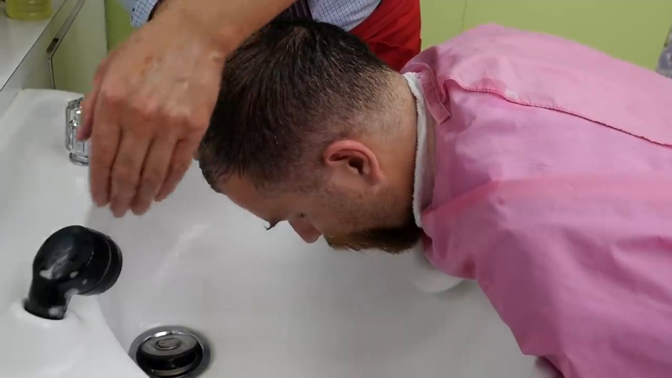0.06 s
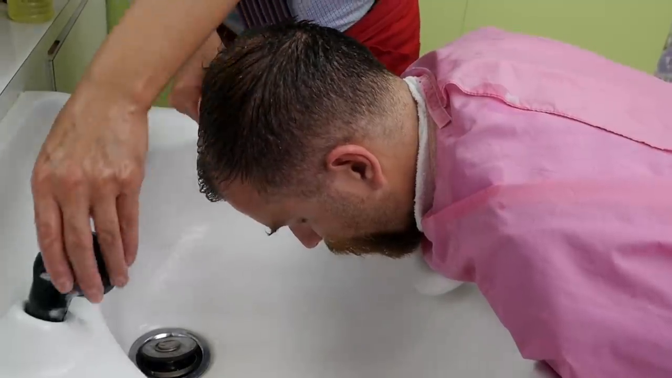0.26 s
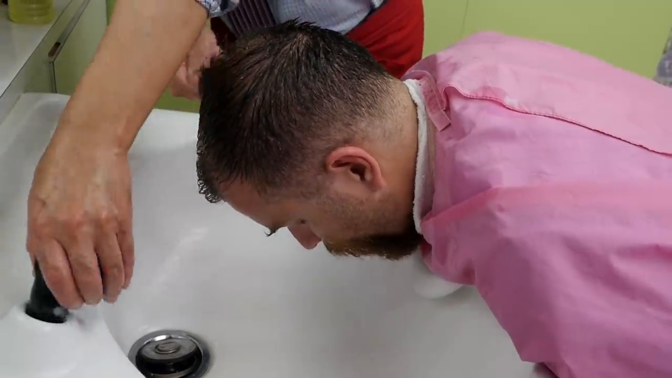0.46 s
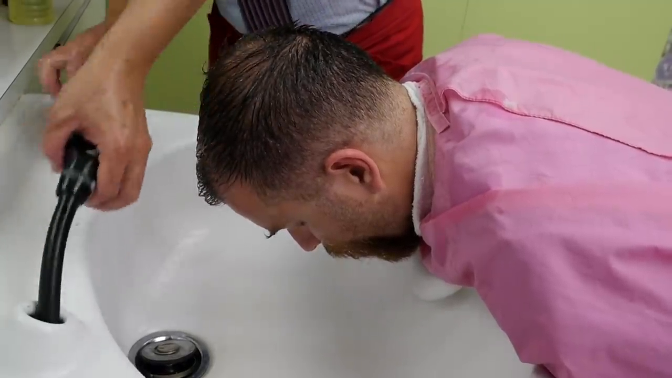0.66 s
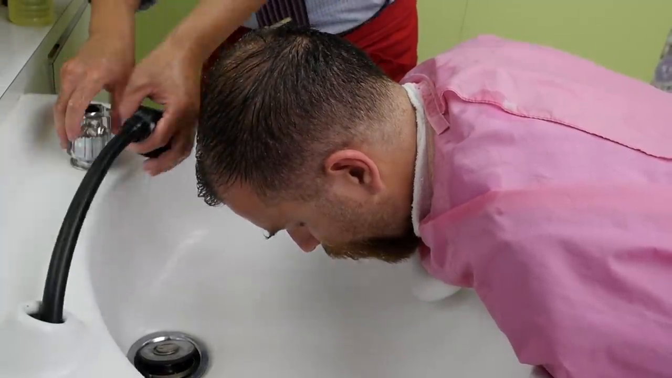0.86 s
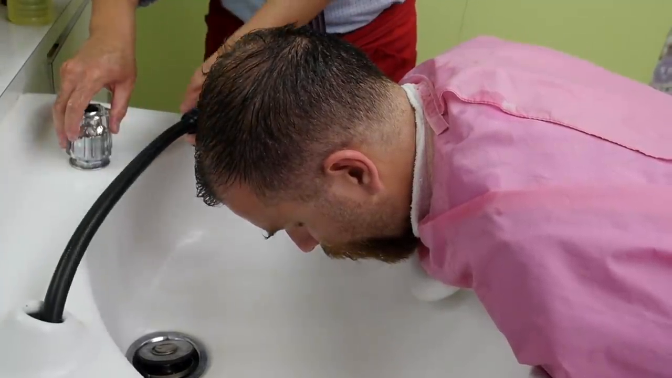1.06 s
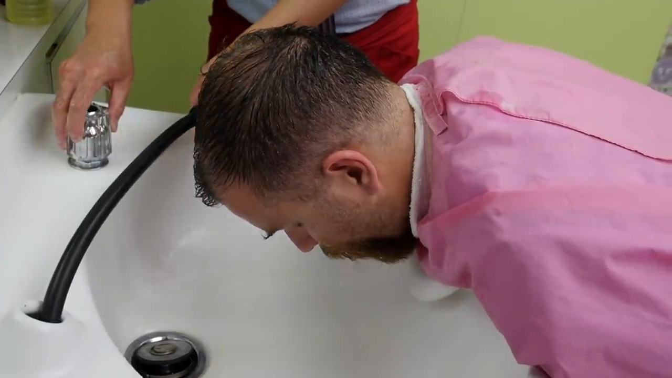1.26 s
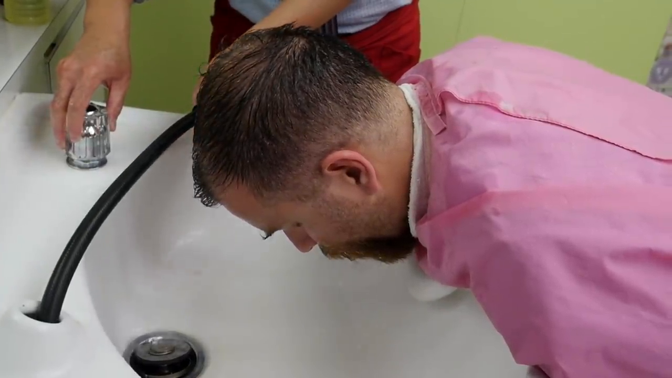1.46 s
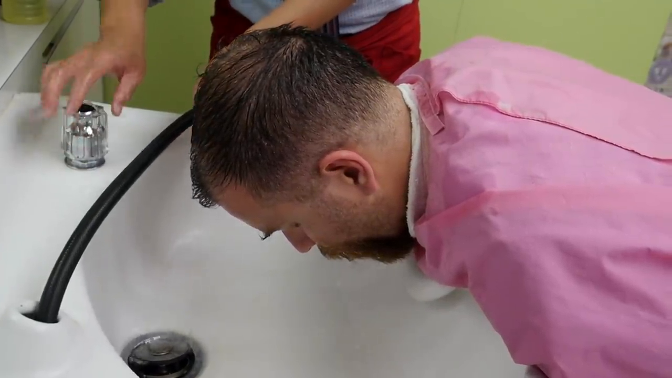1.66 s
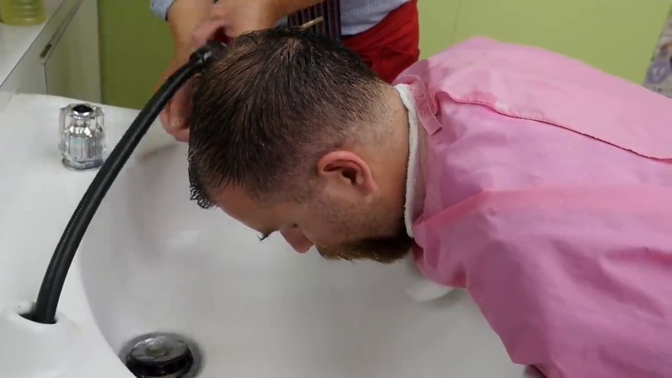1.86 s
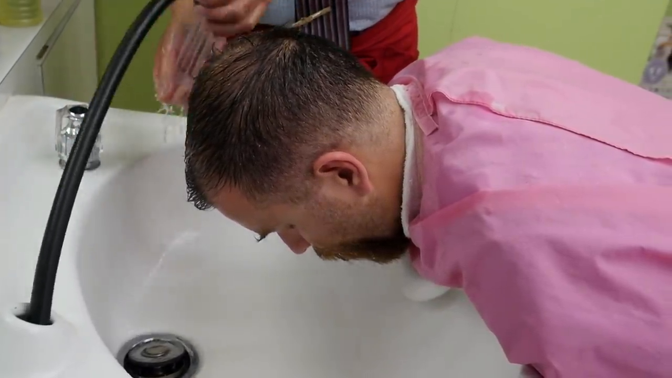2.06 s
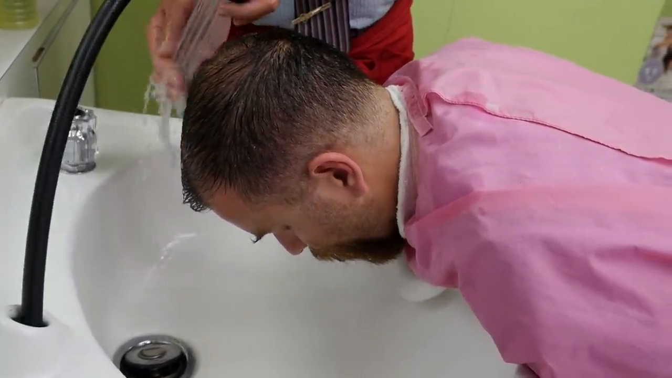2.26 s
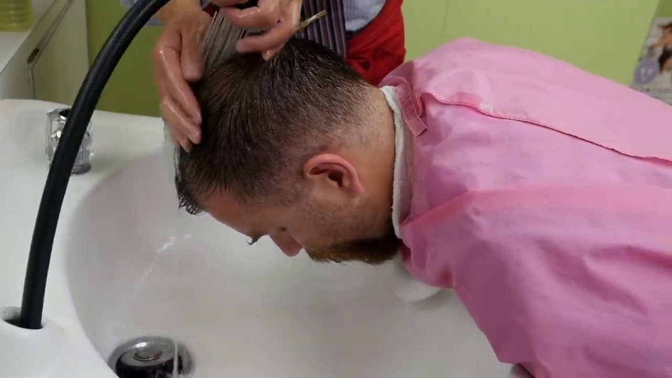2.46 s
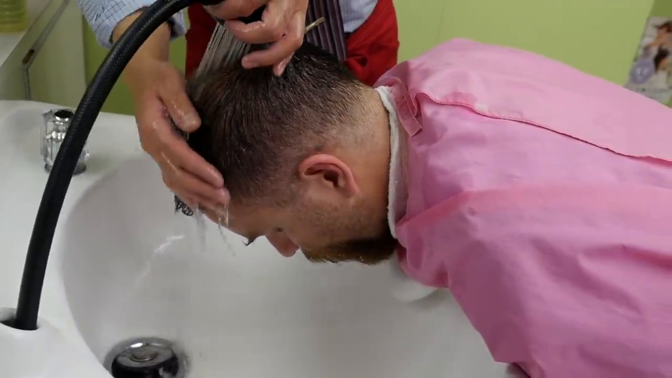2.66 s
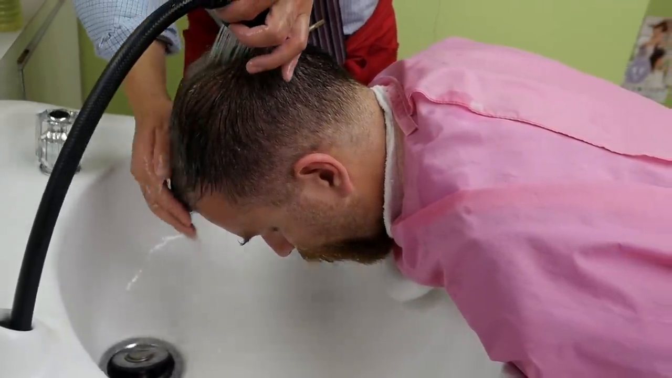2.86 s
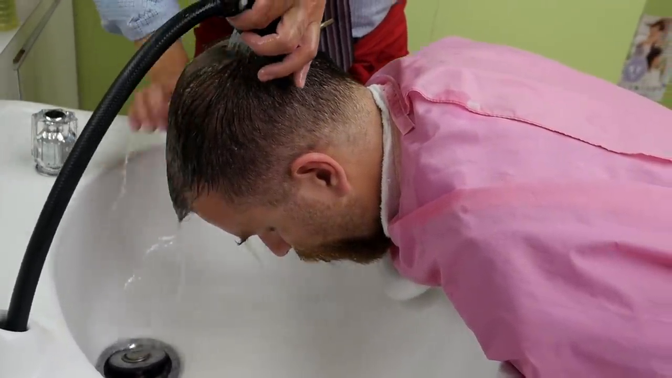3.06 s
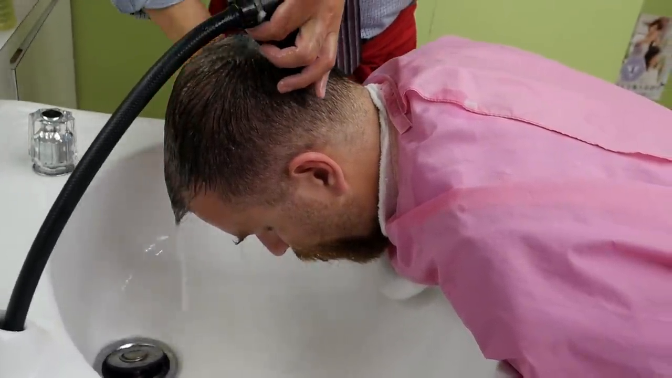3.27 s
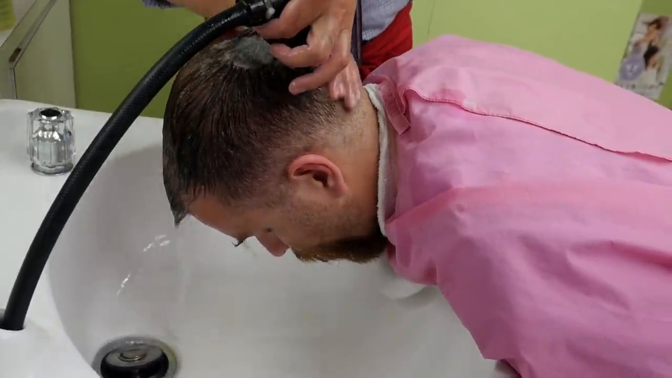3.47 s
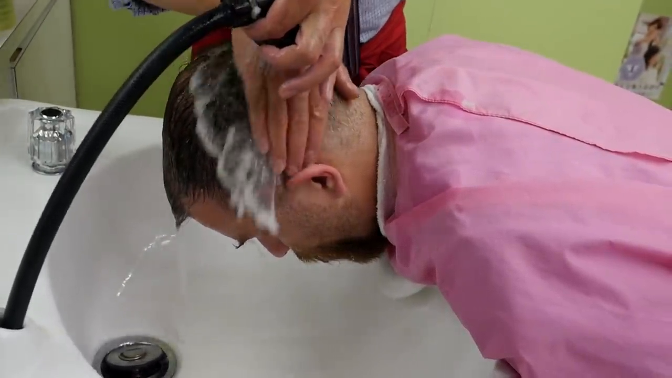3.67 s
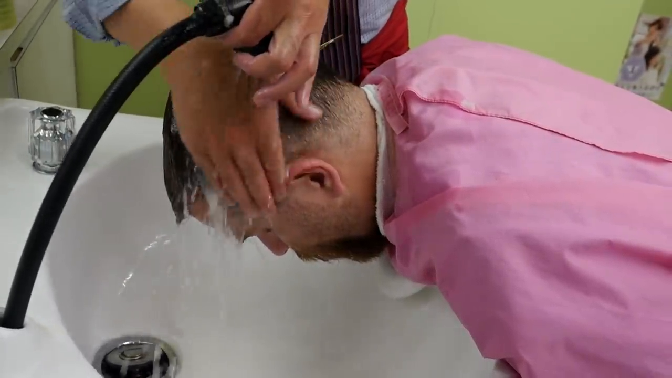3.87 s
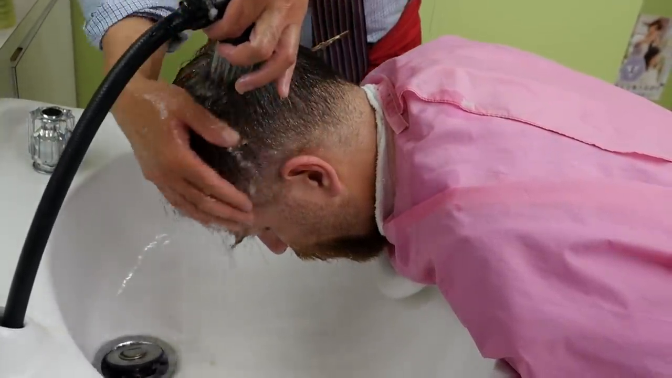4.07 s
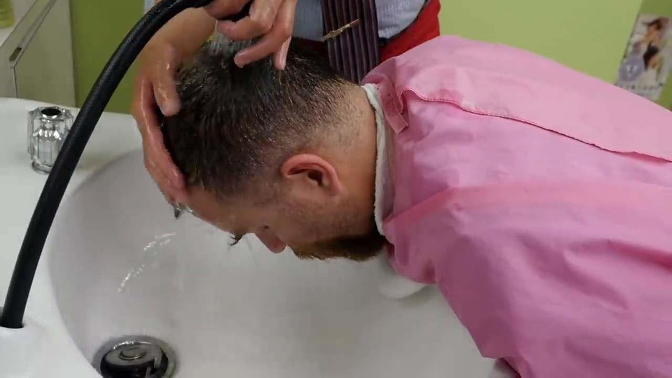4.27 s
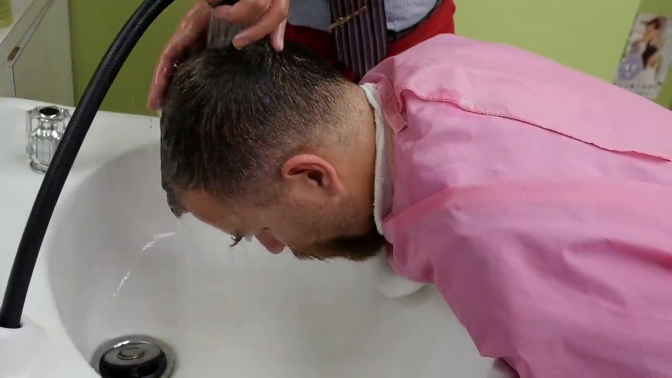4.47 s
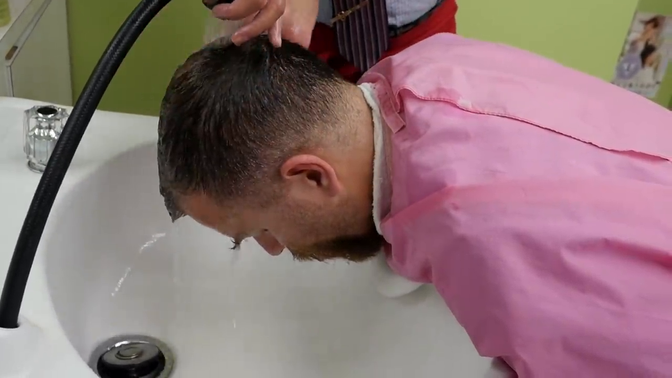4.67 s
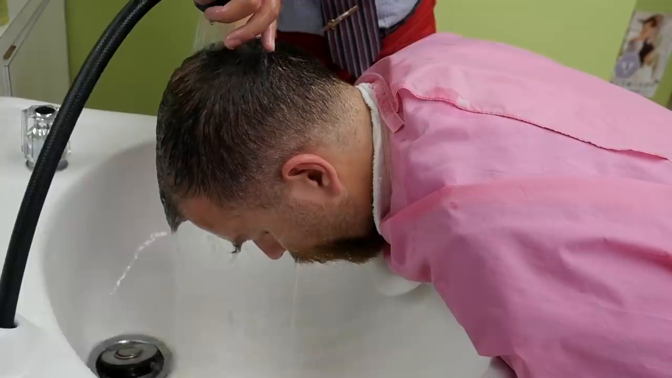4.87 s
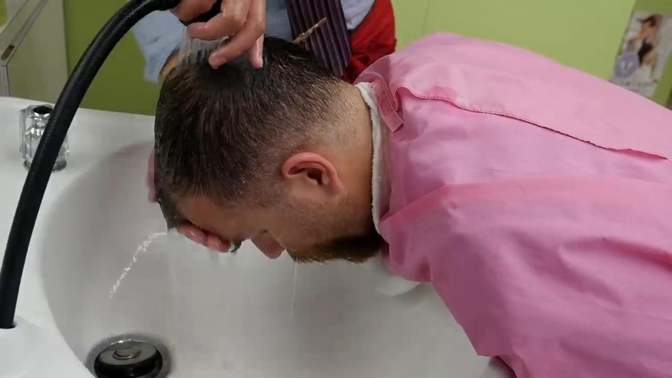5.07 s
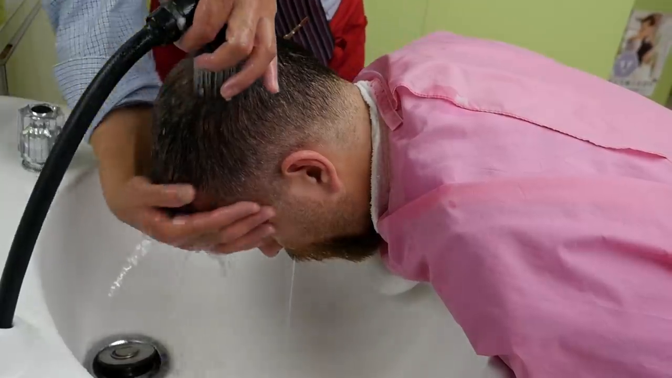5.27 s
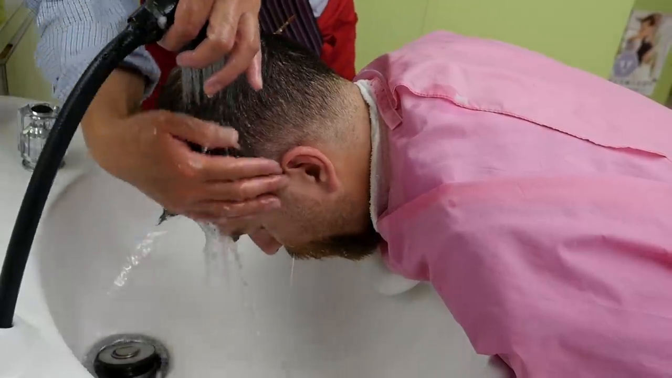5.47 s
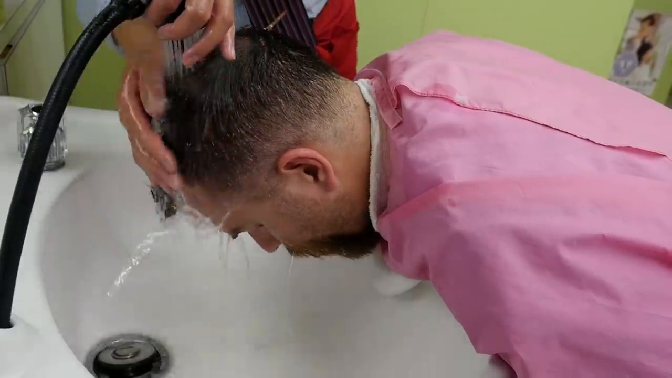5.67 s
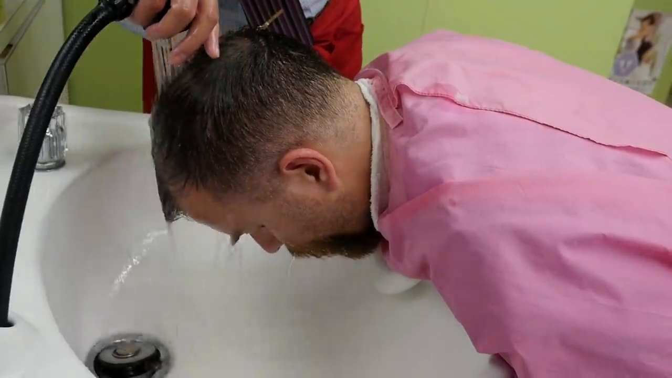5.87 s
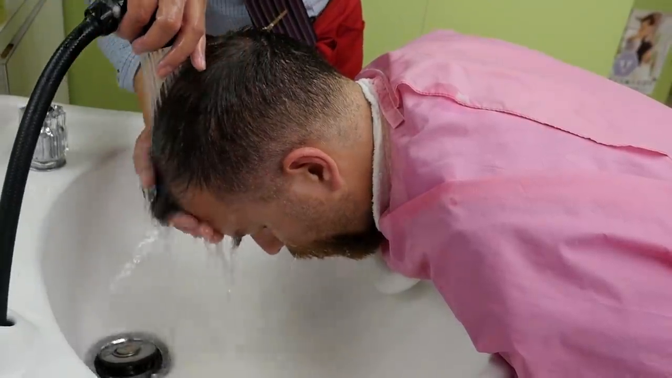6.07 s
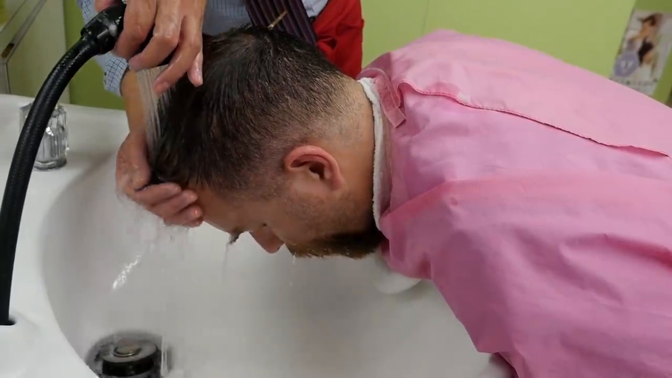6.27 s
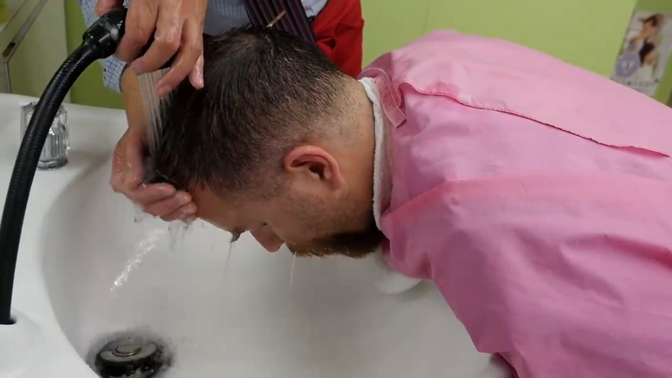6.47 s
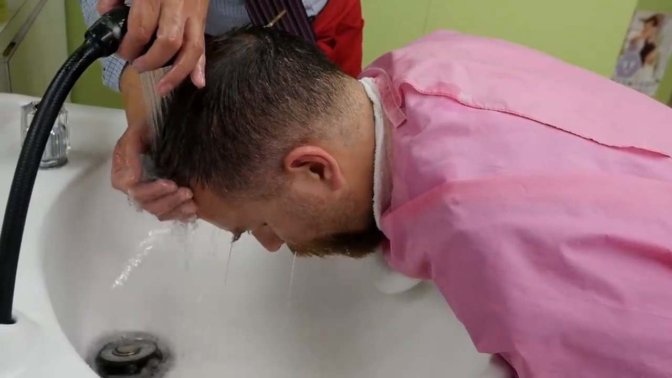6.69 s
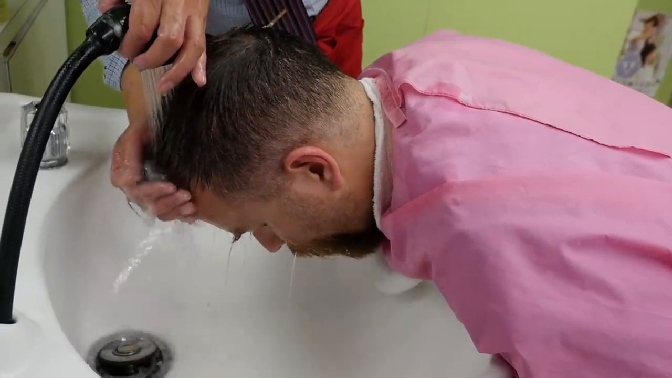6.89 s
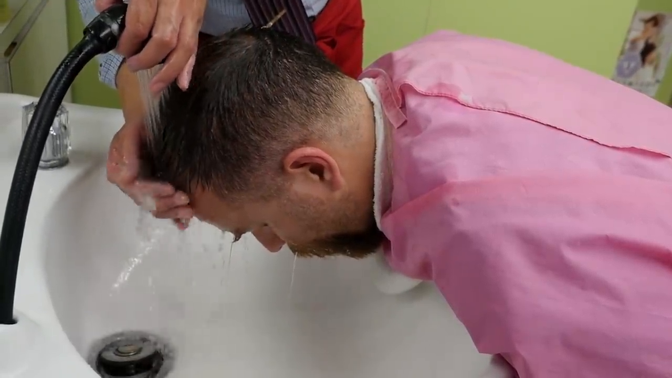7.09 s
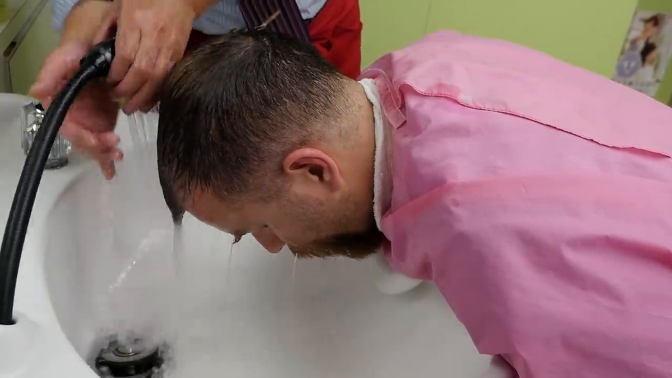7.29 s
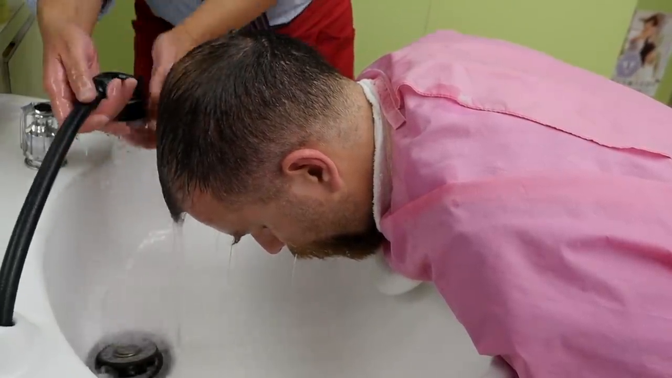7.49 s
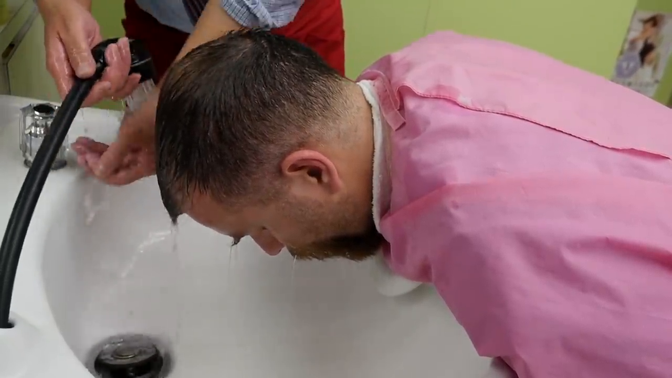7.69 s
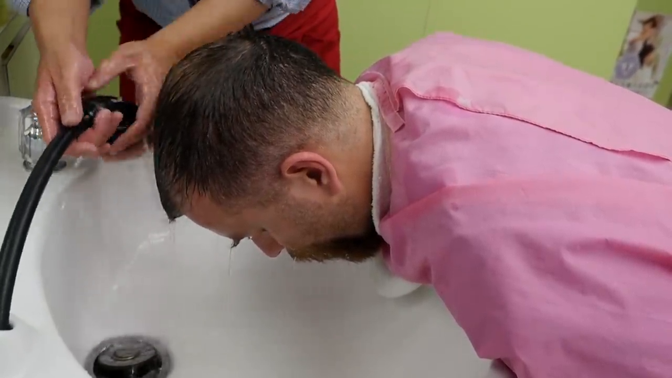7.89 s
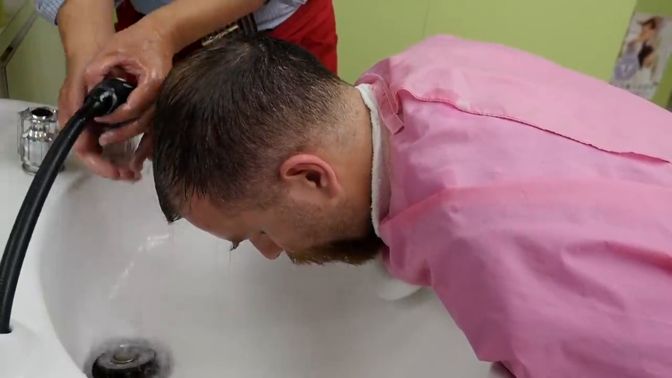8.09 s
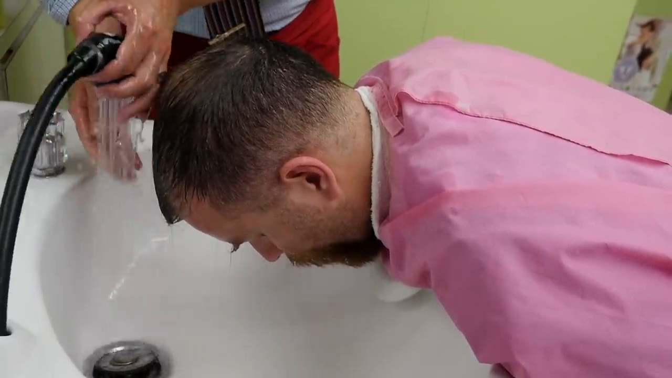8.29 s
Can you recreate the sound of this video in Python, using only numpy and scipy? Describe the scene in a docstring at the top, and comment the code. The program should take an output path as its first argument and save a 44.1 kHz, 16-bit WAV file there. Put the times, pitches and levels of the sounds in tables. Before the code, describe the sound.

Close stereo pickup at a ceramic salon basin in a quiet room. A sprayer clacks out of its seat, bumps thud low, and the hose groans briefly. A tap squeaks high and water jets hiss on. The spray then drums over wet hair in shifting-pitch strokes, with crackling splashes, tiny spits, hollow glugs and faint patter in the bowl.

```python
"""A salon's glazed ceramic basin, where hair is rinsed. The sprayer clacks out of its seat, bumps excite the basin's
low modes, the hose groans by stick-slip as it is pulled out, and the tap's seal squeaks as a gliding tone.
Jets hiss as coloured trains of random impacts, then drum on wet hair and a cupped hand as resonant froth.
Water spits in short unsteady bursts, trapped air glugs in brief throbs, and run-off patters on the basin's modes.
Reflections and a short tail surround these; a quiet room noise dips under loud peaks."""
import sys
import numpy as np
from scipy import signal
from scipy.fft import rfft, irfft
from scipy.io import wavfile
from scipy.ndimage import uniform_filter1d

SR = 44100
rng = np.random.default_rng(int(sys.argv[2]) if len(sys.argv) > 2 else 0)


def transcribe(signal):
    """Save signal, clipped to [-1, 1], as a 16-bit WAV file at the path in sys.argv[1]."""
    frames = np.atleast_2d(signal).T
    limited = np.clip(frames, -1, 1)
    pcm = np.round(limited * 32767).astype(np.int16)
    wavfile.write(sys.argv[1], SR, pcm)


N = 367794
TIME = np.arange(N) / SR
TAP_OPEN_S, CUPPED_S = 1.333, 5.15   # jets start; the hand is cupped from then on

# low modes of the basin: (frequency [Hz], relative level [dB], bandwidth [Hz])
BASIN_MODES = [(185, -2, 26), (273, -4, 19.6), (384, -6, 77), (593, 0, 32)]


def from_db(db):
    """Amplitude ratio of a level in decibels."""
    return 10 ** (np.asarray(db) / 20)


def rms_one(x):
    """Normalization to unit root-mean-square."""
    return x / np.sqrt(np.mean(x ** 2) + 1e-20)


def drift(rate):
    """Band-limited chance: random knots, rate per second, joined by straight lines; rms 1."""
    knots = rng.standard_normal(N // 8)
    return rms_one(np.interp(TIME * rate, np.arange(len(knots)), knots))


def coloured(x, spectrum):
    """Linear filtering in the frequency domain: imposes a spectrum's slopes; rms 1."""
    hz, db = np.transpose(spectrum)
    bins_hz = np.fft.rfftfreq(N, 1 / SR)
    gain = from_db(np.interp(np.log1p(bins_hz), np.log1p(hz), db))
    return rms_one(irfft(rfft(x) * gain, N))


def filtered(x, hz, kind):
    """Third-order Butterworth filtering: low-, high- or band-pass."""
    return signal.sosfilt(signal.butter(3, hz, kind, fs=SR, output="sos"), x)


def resonance(x, hz, width_hz):
    """Damped oscillator: a two-pole resonance with about unit gain at its peak."""
    r = np.exp(-np.pi * width_hz / SR)
    zeros = np.array([1, 0, -1]) * (1 - r * r) / 2
    poles = [1, -2 * r * np.cos(2 * np.pi * hz / SR), r * r]
    return signal.lfilter(zeros, poles, x + 1e-18)


def rung(x, hz, width_hz):
    """Cascaded resonance: two passes give steep skirts; rms 1."""
    return rms_one(resonance(resonance(x, hz, width_hz), hz, width_hz))


def turning(hz):
    """Phase as the time integral of frequency."""
    return 2 * np.pi * np.cumsum(hz) / SR


def drops(per_s, spread_db):
    """Random point process of impacts, many small and a few large, of either sign; rms 1."""
    born = np.flatnonzero(rng.random(N) < per_s / SR)
    sizes = from_db(spread_db * np.minimum(rng.exponential(1, len(born)), 4))
    signs = rng.choice([-1, 1], len(born))
    return rms_one(np.bincount(born, sizes * signs, N))


def add(out, s, sound):
    """Superposition: adds a sound to out, starting at time s."""
    start = max(round(s * SR), 0)
    out[start:start + len(sound)] += sound[:max(N - start, 0)]


def late(x, delay_s):
    """Propagation delay, with silence before the arrival."""
    return np.interp(TIME - delay_s, TIME, x, left=0)


def evened(x):
    """Running level normalization: holds the short-time rms near 1 and keeps the grain."""
    return x / np.sqrt(np.abs(uniform_filter1d(x ** 2, size=1600)) + 1e-9)


def hollow(x, gain, size=1):
    """Comb filtering: the bowl's open mouth returns the sound inverted, dulled over size samples."""
    returned = late(uniform_filter1d(x, size), .00119)
    return (x - gain * returned) / np.sqrt(1 + gain ** 2)


def room_noise(foreground):
    """Stationary coloured noise, partly shared by both channels, that dips under loud peaks and recovers slowly."""
    # (frequency [Hz], relative spectral level [dB])
    air_spectrum = [(30, -0.5), (90, -9.5), (220, -1), (900, -8), (3500, -7), (16000, -17)]
    level_db, duck_from_db, recovery_db_per_s = -36, -11, 16
    peak = np.abs(foreground).max(axis=0)
    over_db = 20 * np.log10(np.maximum(peak / from_db(duck_from_db), 1))
    recovery_db = recovery_db_per_s * TIME
    duck_db = np.maximum.accumulate(over_db + recovery_db) - recovery_db
    noise = rng.standard_normal(N) + 0.49 * rng.standard_normal(foreground.shape)
    return from_db(level_db - duck_db) * coloured(noise, air_spectrum)


def sprayer_and_hose(jitter=0.095, rub_db=1.02, clack_db=-10, clack_s=0.0038, lift_s=.568):
    """Impact and stick-slip: a clack from the seat, bumps ringing basin modes, the hose groaning in its hole."""
    # sprayer, hose and hand bumping the basin: (time [s], relative level [dB])
    bumps = [(0.572, -14), (0.595, -17.5), (0.706, -20.5), (4.843, -38.5), (7.51, -42), (7.615, -32.5),
             (7.64, -39), (7.675, -39), (7.873, -27.5), (7.905, -39), (7.94, -42), (8.166, -31),
             (8.278, -35.5)]
    # groan of the hose: (time [s], relative level [dB], mean pitch [Hz])
    hose_pull = [(0.716, -26, 198.7), (.765, -17, 225), (0.837, -18, 274.3), (0.899, -27, 225),
                 (0.939, -14, 223), (0.969, -22.5, 197.3), (1.1, -55, 190)]
    knocks = np.zeros(N)
    for hz, level_db, width_hz in BASIN_MODES:
        clicks = np.zeros(N)
        for s, db in bumps:
            add(clicks, s + 0.00673 * rng.random(), from_db([db + level_db]))
        knocks += resonance(clicks, hz, width_hz) * SR / (np.pi * width_hz)
    s, db, hz = np.transpose(hose_pull)
    unsteady_hz = np.interp(TIME, s, hz) * np.exp(jitter * drift(200))
    slips = signal.sawtooth(turning(unsteady_hz), .72)
    rub = from_db(rub_db) * rng.standard_normal(N)
    groan = np.interp(TIME, s, from_db(db), left=0, right=0) * (slips + rub)
    clack = coloured(rng.standard_normal(N), [(900, -23), (3500, -8.5), (9000, -35.5)])
    clack *= (TIME > lift_s) * np.exp(-np.abs(TIME - lift_s) / clack_s)
    return filtered(knocks + groan, [120, 620], "band") + from_db(clack_db) * clack


def tap():
    """Frictional squeal: the rubber seal grabs roughly, settles on one pitch and stutters as the spindle turns."""
    # (time [s], relative level [dB], mean pitch [Hz])
    squeak = [(1.164, -47, 1126), (1.167, -1.5, 1216), (1.174, -7, 3110), (1.188, 6.5, 3108),
              (1.2, -18, 3060), (1.27, -29, 3086), (1.35, -27, 3120), (1.38, -81.5, 3130)]
    s, db, hz = np.transpose(squeak)
    level_db, pitch_hz = np.interp(TIME, s, db), np.interp(TIME, s, hz)
    grabbing = np.maximum(1 - pitch_hz / 3050, 0)   # rougher at lower pitch
    phase = turning(pitch_hz * np.exp((0.00856 + 0.6 * grabbing) * drift(2500)))
    stutter_depth = np.clip(-level_db / 35, 0, 1)   # deeper as the level falls
    stutter = 0.5 + stutter_depth * np.tanh(drift(129.3))
    level = from_db(level_db)
    octave = from_db(-26.5) * np.sqrt(level) * np.sin(2 * phase)
    return filtered(level * stutter * (np.sin(phase) + octave), 310, "high")


def on_hair(s):
    """Transition of the target: 0 while the jets run bare, 1 once they have reached the hand and head."""
    return np.interp(s, [1.88, 2.0], [0, 1])


def stroke(s, length_s, attack_s, release_s):
    """Envelope: linear rise, hold until length_s is over, exponential decay."""
    rise = np.clip((TIME - s) / attack_s, 0, 1)
    return rise * np.exp(-np.clip((TIME - s - length_s) / release_s, 0, 20))


def rinse():
    """Energy summation of wash, jets, passes and splashes; pitch and singing are power-weighted means.

    Returns gain, pitch and singing of the drumming, then the gains of sizzle, rush and crackle."""
    # passes of the jets over the head, gliding in pitch: (start [s], full [s], end [s], drumming level [dB],
    # first pitch [Hz], pitch at the end [Hz], singing of the air pocket relative to the froth [dB])
    passes = [(1.887, 1.91, 2.16, -20, 2480, 1860, 4.5), (2.047, 2.184, 2.41, -21.5, 1490, 1320, -10),
              (2.802, 3.09, 3.12, -26, 3320, 3240, 7), (2.94, 3.338, 3.5, -22, 2250, 1880, 4),
              (3.4, 3.52, 3.65, -17, 2230, 1910, -12), (3.979, 4.172, 4.4, -21, 3600, 2550, 6),
              (4.223, 4.475, 4.65, -18, 2700, 2100, 0), (4.6, 4.662, 4.855, -19, 2200, 2740, -0.5),
              (5.24, 5.347, 5.41, -21.5, 3450, 3340, 0.5)]
    # handfuls of water swept off the head:
    # (time [s], length [s], drumming level [dB], first pitch [Hz], crackle level [dB])
    splashes = [(2.467, 0.13, -43, 2302, -21.5), (2.648, 0.037, -44, 2300, -28.5),
                (3.586, 0.11, -40.5, 2040, -24.5), (3.853, 0.062, -38, 3500, -22),
                (4.011, 0.065, -32, 4200, -25), (5.543, 0.04, -25, 2180, -26.5),
                (5.629, 0.051, -27, 1520, -25), (6.343, 0.12, -24, 2420, -29.5),
                (6.769, 0.045, -25.5, 1930, -34), (7.172, 0.06, -24.5, 2200, -34),
                (7.347, 0.038, -21, 1790, -23.5), (7.406, 0.087, -29.5, 1720, -28),
                (7.521, 0.1, -25.5, 1840, -33), (7.83, 0.037, -20, 2000, -30),
                (8.021, 0.082, -26, 2550, -19), (8.141, 0.12, -28, 2450, -23.5)]
    jets_db, jets_fade_db_per_s = -16, 3   # fading as the sprayer is raised
    jets_buried_s, burying_s = 2.395, 0.033   # the jets sink into the hair
    wash_hiss_db, wash_drum_db, wash_hz = -32, -47, 2510   # steady wash between the strokes
    pass_swell_db, pass_hiss_db = 20.5, -14   # rise from start to full; crackle relative to drumming
    attack_s, release_s = 0.0058, 0.018   # a pass dies as the hand covers the spot
    sag_octaves_per_s, splash_bare_db = 0.77, -3.5   # sizzle of a splash relative to its crackle

    fade_db = jets_db - jets_fade_db_per_s * (TIME - TAP_OPEN_S)
    jets = from_db(fade_db) * stroke(TAP_OPEN_S, jets_buried_s - TAP_OPEN_S, 0.033, burying_s)
    sizzle = jets * np.sqrt(1 - on_hair(TIME))
    rush = jets * np.sqrt(on_hair(TIME))
    crackle = from_db(wash_hiss_db) * on_hair(TIME)
    drums = [(from_db(wash_drum_db), wash_hz, 1)]   # gain, pitch, singing
    for start, full, end, db, first_hz, last_hz, pocket_db in passes:
        swell_db = np.interp(TIME, [start, full], [-pass_swell_db, 0])
        gain = from_db(db + swell_db) * stroke(start, end - start, attack_s, release_s)
        glide_hz = np.interp(TIME, [start, end], [first_hz, last_hz])
        drums.append((gain, glide_hz, from_db(pocket_db)))
        crackle = np.hypot(crackle, gain * from_db(pass_hiss_db))
    for s, length_s, body_db, hz, hiss_db in splashes:
        gain = stroke(s, length_s, attack_s, release_s)
        sag = sag_octaves_per_s * np.clip(TIME - s, 0, length_s + release_s)
        drums.append((gain * from_db(body_db), hz * np.exp2(-sag), 0))
        spray = gain * from_db(hiss_db)
        sizzle = np.hypot(sizzle, spray * from_db(splash_bare_db))
        crackle = np.hypot(crackle, spray)
    power = sum(np.square(gain) for gain, _, _ in drums)
    pitch_hz = sum(np.square(gain) * hz for gain, hz, _ in drums) / power
    pocket_gain = sum(np.square(gain) * pocket for gain, _, pocket in drums) / power
    return np.sqrt(power), pitch_hz, pocket_gain, sizzle, rush, crackle


def patchy(x, patchy_db=3, rate=70):
    """Independent band modulation: each band flickers on its own, so the colour keeps shifting."""
    out, rest = np.zeros(N), x
    for hz in np.geomspace(2800, 12000, num=6):
        out += filtered(rest, hz, "low") * from_db(patchy_db * drift(rate))
        rest = filtered(rest, hz, "high")
    return rms_one(out + rest * from_db(patchy_db * drift(rate)))


def hiss(sizzle_gain, rush_gain, crackle_gain):
    """Noise of many impacts: bare jets sputter hollowly, rush on the open hand and crackle in clumps on wet hair."""
    # spectra before the bowl's ripple: (frequency [Hz], relative spectral level [dB])
    jets_spectrum = [(900, -24.5), (2100, -9.5), (2600, -12), (9000, 4), (16000, -2)]
    rush_spectrum = [(900, -27), (1400, -2), (6500, -4), (16000, -15)]
    wet_spectrum = [(300, -25), (1000, -15.5), (3700, 8), (7200, 8), (10000, -3.5), (16000, -16.5)]
    bare = hollow(coloured(drops(per_s=13000, spread_db=4.3), jets_spectrum), gain=0.84, size=6)
    bare = bare * from_db(1.4 * drift(120))
    rush = coloured(drops(per_s=18000, spread_db=6), rush_spectrum) * from_db(drift(60))
    crackle = coloured(patchy(drops(per_s=6400, spread_db=2)), wet_spectrum)
    crackle = crackle * from_db(1.4 * drift(220))
    mix = sizzle_gain * rms_one(bare) + rush_gain * rush + crackle_gain * rms_one(crackle)
    return hollow(mix, gain=0.32)


def burst(hz, spread, length_s):
    """Frequency-modulated wave packet: a Gaussian swell of unsteady pitch, cresting after twice length_s."""
    t = np.arange(SR // 16) / SR
    period = int(np.ceil(SR / hz))
    wobble = rms_one(uniform_filter1d(rng.standard_normal(len(t)), period))
    return np.exp(-np.square(t / length_s - 2)) * np.sin(turning(hz * np.exp(spread * wobble)))


def spits(hiss_gain, length_s=0.0015, splat_spread=0.17, chirp_spread=0.1, count=250):
    """Transient wave packets: broad splats from the hair, chirps between the fingers, small spits at random."""
    # water spitting through narrow gaps: (crest time [s], relative level [dB], mean pitch [Hz])
    gap_spits = [(1.612, -10.5, 5280), (1.807, -9.5, 7030), (1.858, -8, 5300), (1.87, -13, 5900),
                 (2.366, -5, 7370), (2.439, -6.5, 5610), (2.485, -7.5, 6100), (2.549, -7.5, 4700),
                 (2.59, -2, 7500), (2.671, -15, 2050), (2.787, -4.5, 8620), (2.865, -9.5, 3240),
                 (2.935, 0, 3060), (2.996, -13, 7500), (3.084, -8.5, 5830), (3.391, -13, 7750),
                 (3.66, -6, 9100), (3.86, -10, 3200), (3.87, -11.5, 4100), (3.923, -7, 7147),
                 (4.024, -10, 4040), (4.039, -9, 4680), (4.072, -8, 7620), (4.334, -6.5, 6580),
                 (4.864, -3.5, 6160), (4.895, -11, 4203), (4.939, -9.5, 8330), (5.11, -7, 10290),
                 (5.244, -11, 6200), (5.256, -13.5, 5680), (5.386, -7, 2920), (5.479, -7, 6600),
                 (5.555, -9.5, 2120), (5.613, -12, 2970), (5.688, -3, 4670), (5.708, -11, 4840),
                 (5.897, -7.5, 8000), (5.915, -2.5, 2790), (5.994, -14.5, 5500), (6.01, -13, 4450),
                 (6.111, -7, 4720), (6.174, -12.5, 4630), (6.397, -1.5, 2270), (6.451, -6.5, 3000),
                 (6.528, -7.5, 2830), (6.579, -8.5, 7050), (6.695, -12.5, 6600), (6.778, -16.5, 1885),
                 (6.796, -8.5, 3520), (6.927, -5, 3840), (6.99, -9.5, 5600), (7.202, -9, 4560),
                 (7.227, -6, 2760), (7.313, 0, 2990), (7.342, -11, 6580), (7.549, -8, 1930),
                 (7.605, -12, 5400), (7.713, -7.5, 6650), (7.775, -13.5, 5260), (7.83, -6.5, 3580),
                 (7.986, -13, 6730), (8.04, -8, 4760), (8.049, -10, 5600), (8.191, -12, 2870),
                 (8.233, -10.5, 4020), (8.297, -11, 4400)]
    out = np.zeros(N)
    for s, db, hz in gap_spits:
        spread = chirp_spread if s > CUPPED_S else splat_spread   # in natural-log pitch
        add(out, s - 2 * length_s, from_db(db) * burst(hz, spread, length_s))
    for when, size, pitch in rng.random((count, 3)):
        s = when * N / SR
        gain = min(np.interp(s, TIME, hiss_gain), from_db(-23)) * from_db(14.5 * np.square(size))
        add(out, s, gain * burst(3000 * 4.8 ** pitch, 0.016, length_s))
    return filtered(out, 1600, "high")


def drumming(pitch_hz, pocket_gain, free_width=0.5, cupped_width=0.26, pocket_width=0.31, overtone_db=-6):
    """Impact-driven resonance: jets beat a dense froth into wet hair and set a pocket of air singing.

    In the cupped hand bubbles are fewer and gather round two pitches an octave apart. Widths: natural-log pitch."""
    # air pocket between sprayer and head: (frequency [Hz], bandwidth [Hz], relative level [dB])
    pocket_modes = [(2139, 224, 0), (3036, 260, -1)]

    def share(hz, width):
        return np.exp(-np.square(np.log(hz / pitch_hz) / width))

    cupped = TIME > CUPPED_S
    width = np.where(cupped, cupped_width, free_width)
    per_s = np.where(cupped, 200, 450)
    froth = np.zeros(N)
    for hz in np.geomspace(1130, 4600, num=19):
        weight = share(hz, width) + cupped * from_db(overtone_db) * share(hz / 2, width)
        froth += weight * rung(drops(per_s, spread_db=6.5), hz, hz / 11)
    pocket = np.zeros(N)
    for hz, width_hz, db in pocket_modes:
        pocket += from_db(db) * share(hz, pocket_width) * rung(rng.standard_normal(N), hz, width_hz)
    return evened(evened(hollow(froth, gain=0.32)) + pocket_gain * pocket)


def runoff(water_gain):
    """Modal excitation: falling water patters on the basin, following the drumming once the hand is cupped."""
    steady_db, share_db, fall_s = -57.5, -28, 0.071   # share is relative to the drumming above
    patter = np.zeros(N)
    for hz, db, width_hz in BASIN_MODES:
        patter += from_db(db) * rms_one(resonance(drops(per_s=90, spread_db=5.5), hz, width_hz))
    fallen = from_db(share_db) * late(water_gain, fall_s) * (TIME > CUPPED_S)
    return (from_db(steady_db) * on_hair(TIME) + fallen) * rms_one(patter)


def water(drum_gain, pitch_hz, pocket_gain, sizzle_gain, rush_gain, crackle_gain):
    """Superposition of the running water: drumming on the head, hiss of the jets, run-off in the basin."""
    wetted = np.sqrt(on_hair(TIME))   # the drumming starts with the first jets on the head
    drums = wetted * drum_gain * drumming(pitch_hz, pocket_gain)
    return drums + hiss(sizzle_gain, rush_gain, crackle_gain) + runoff(drum_gain)


def glugs(length_s=0.00748, gurgle_db=-29, gurgle_s=0.035):
    """Bubble oscillation: trapped air throbs for a few cycles amid a gurgle at its pitch and an octave below."""
    # air trapped under the hand: (start of the throb [s], relative level [dB], pitch [Hz])
    air_pockets = [(2.298, -24, 400), (3.805, -19, 1178), (5.06, -31, 1960), (5.385, -25.5, 578.1),
                   (6.356, -20, 580), (6.912, -5.5, 583), (7.154, -24, 575), (8.129, -17.5, 590)]
    out = np.zeros(N)
    t = np.arange(-SR // 8, SR // 8) / SR   # 0 at the middle of the throb
    for s, db, hz in air_pockets:
        throb = np.exp(-(t / length_s) ** 4) * np.sin(turning(np.full_like(t, hz)))
        churn = sum(rung(rng.standard_normal(len(t)), f, f / 4) for f in (hz, hz / 2))
        gurgle = from_db(gurgle_db) * np.sqrt(from_db(db)) * churn * np.exp(-np.abs(t) / gurgle_s)
        add(out, s + length_s + t.min(), from_db(db) * throb + gurgle)
    return out


def salon(x, t60=0.2, wet_db=-16, bright_db=-11):
    """Reflection and reverberation: quick echoes from the bowl, then a short bright tail unlike on each side."""
    # reflections off the glazed bowl: (delay [s], gain)
    bowl_echoes = [(.0031, 0.076), (.0095, 0.22)]
    near = x + sum(gain * late(x, delay) for delay, gain in bowl_echoes)
    t = np.arange(int(t60 * SR)) / SR
    tails = rng.standard_normal((2, len(t))) * from_db(-60 * t / t60)
    wet = np.array([signal.fftconvolve(x, tail / np.linalg.norm(tail))[:N] for tail in tails])
    return near + from_db(wet_db) * wet + from_db(bright_db) * filtered(wet, 3900, "high")


def scene():
    """Superposition of all sources in stereo: scattered water enters the two sides in opposite phase."""
    flow = rinse()
    crackle_gain = flow[-1]
    middle, sides = water(*flow), water(*flow)
    basin = salon(middle + spits(crackle_gain) + glugs() + tap())
    scatter = from_db(-13.5) * np.array([sides, -sides])
    hose = salon(sprayer_and_hose(), wet_db=-9.5) * from_db([[1], [-1]])   # slightly to the left
    foreground = basin + scatter + hose
    return foreground + room_noise(foreground)


def record(dry):
    """Saturation and band limiting: peaks are rounded, then the top is cut above 15.9 kHz."""
    rounded = np.cbrt(np.tanh(dry ** 3))
    return signal.sosfilt(signal.ellip(10, .2, 70, 15900, fs=SR, output="sos"), rounded)


dry = scene()
out = record(dry)
transcribe(out)
```